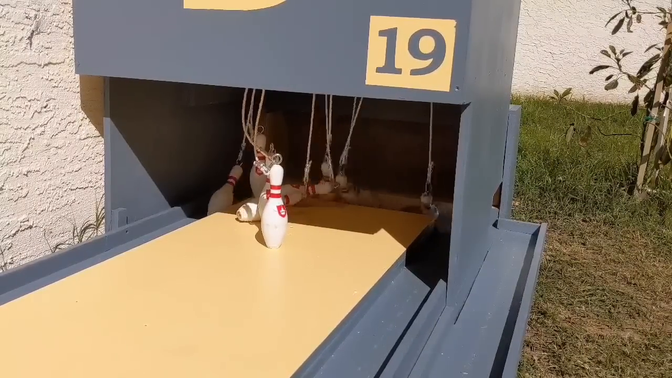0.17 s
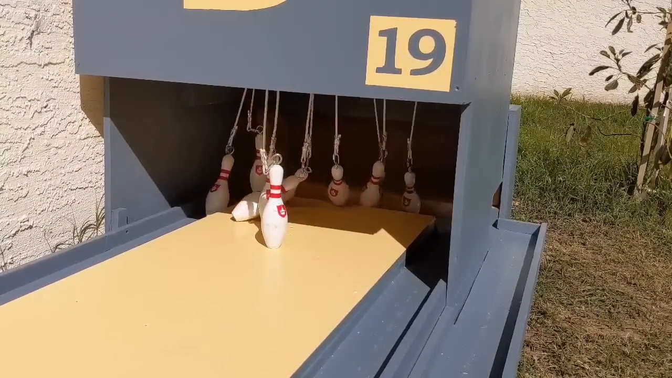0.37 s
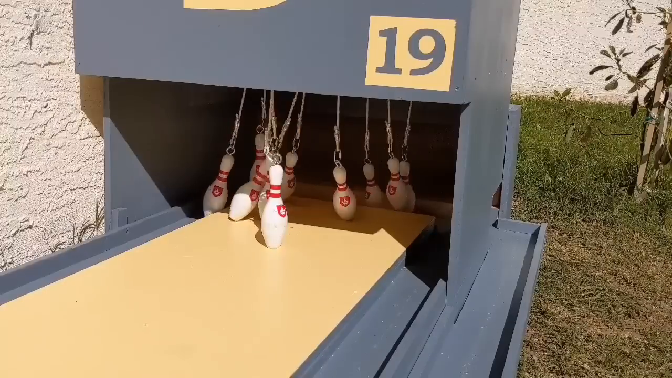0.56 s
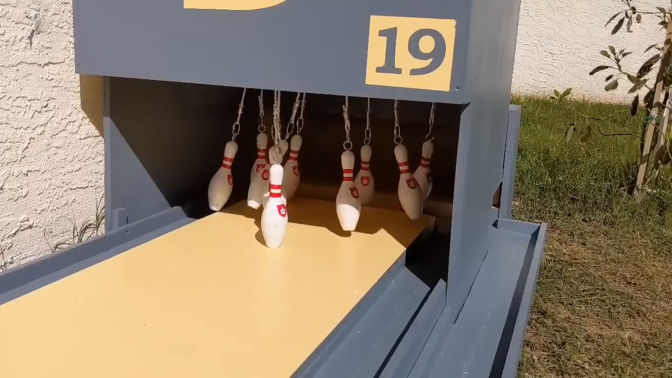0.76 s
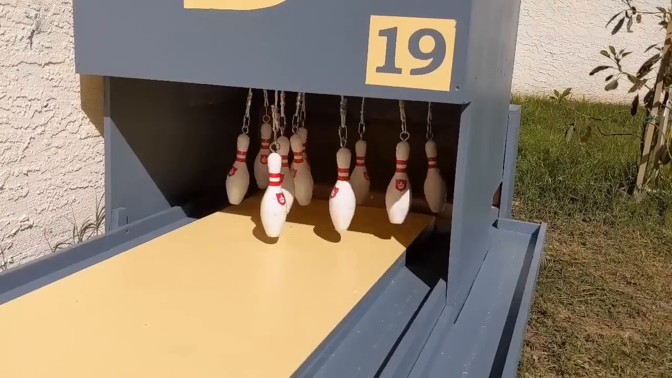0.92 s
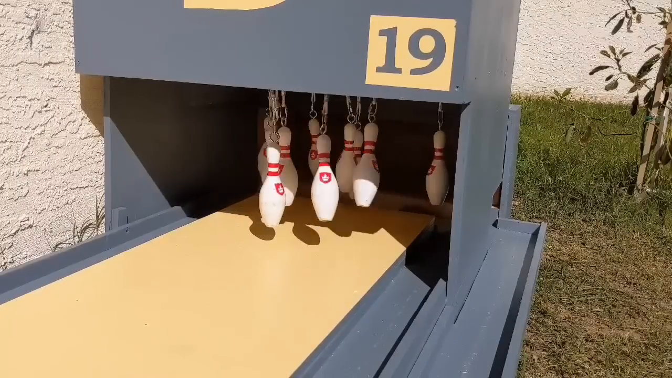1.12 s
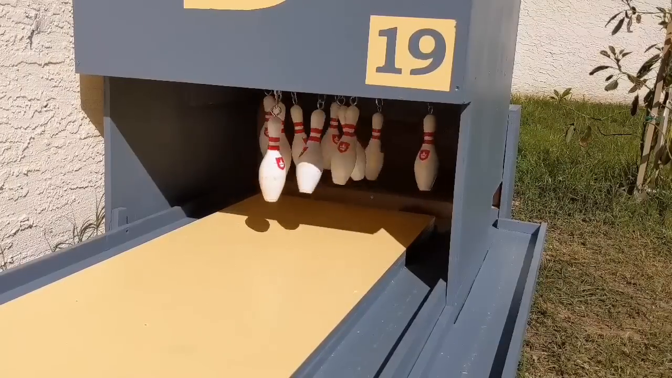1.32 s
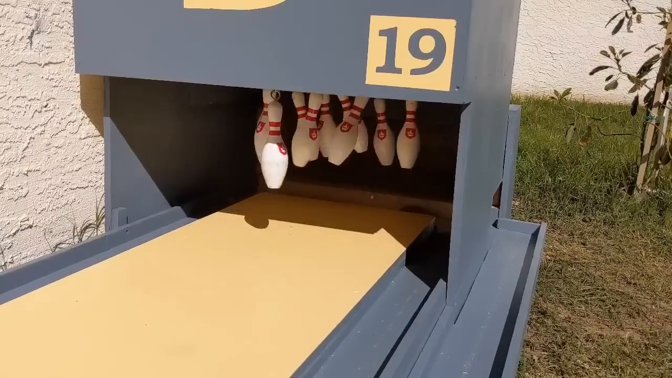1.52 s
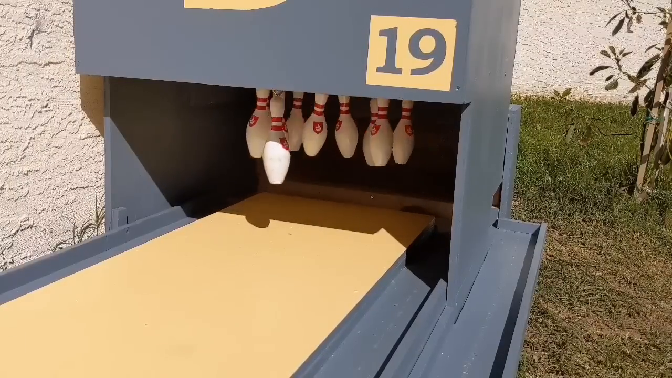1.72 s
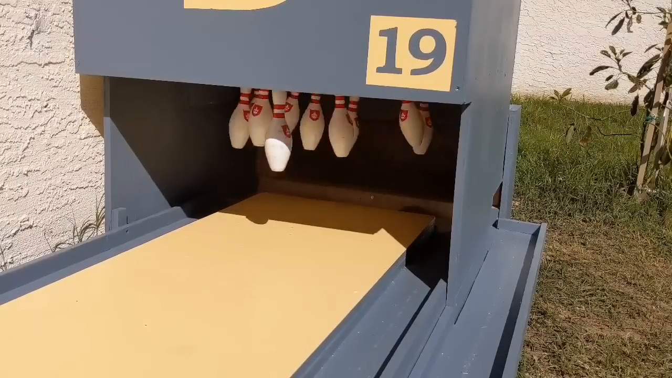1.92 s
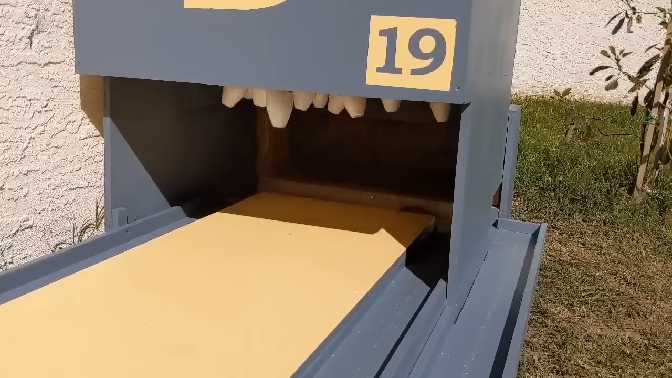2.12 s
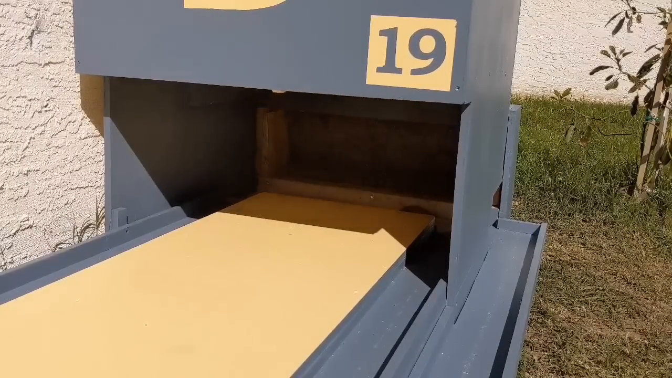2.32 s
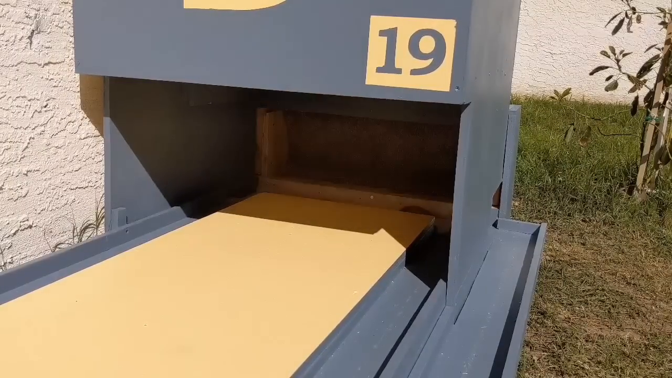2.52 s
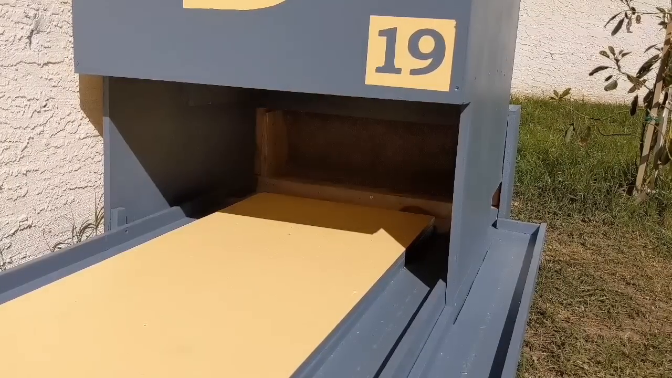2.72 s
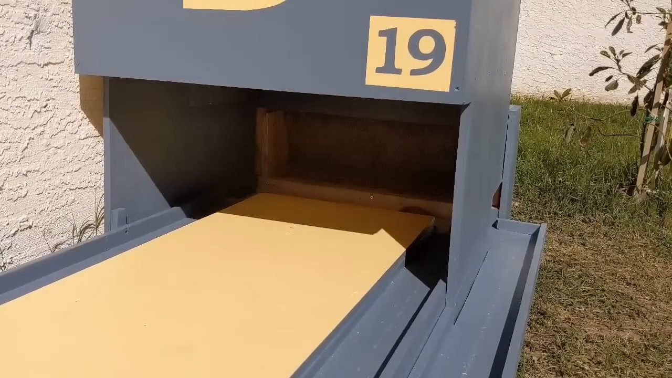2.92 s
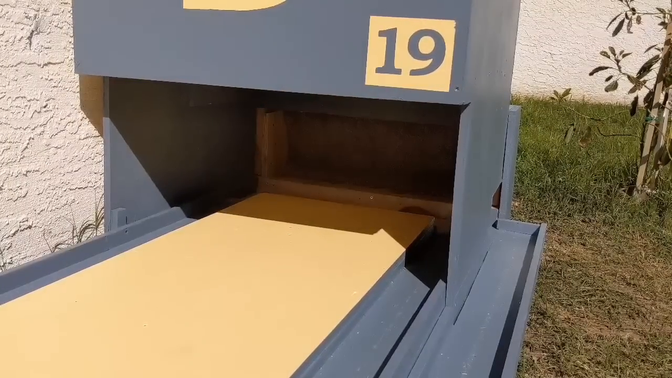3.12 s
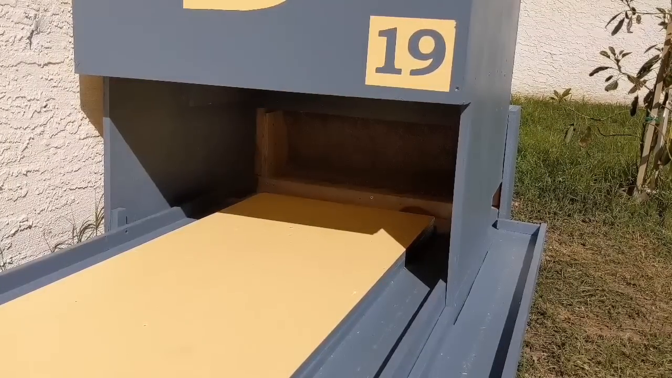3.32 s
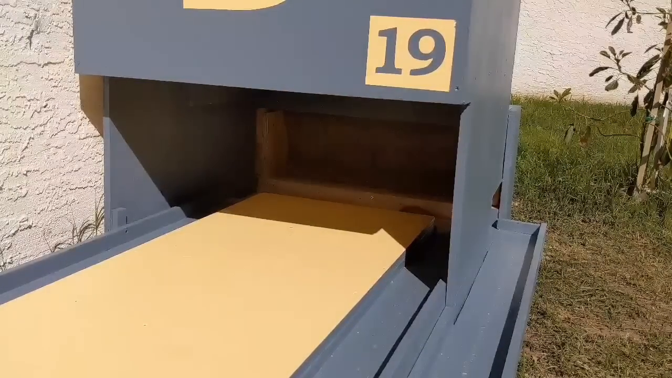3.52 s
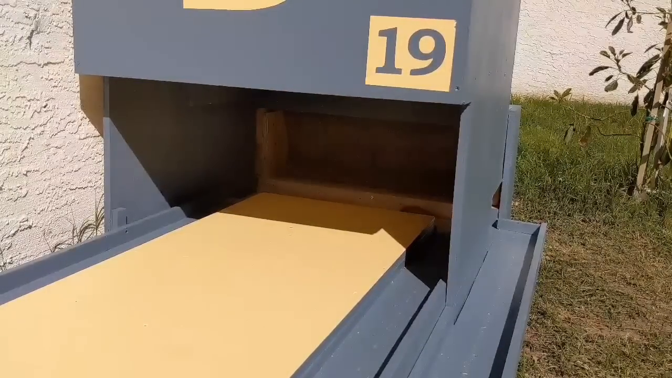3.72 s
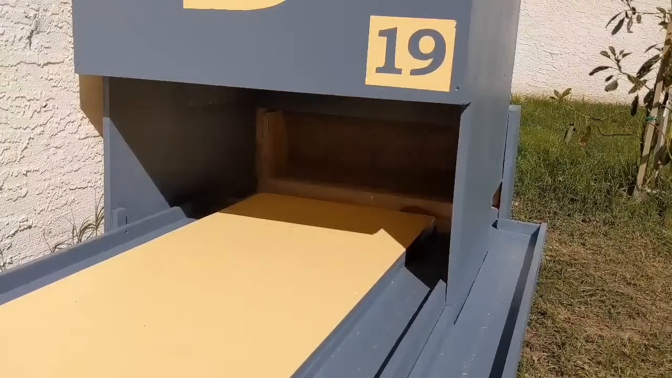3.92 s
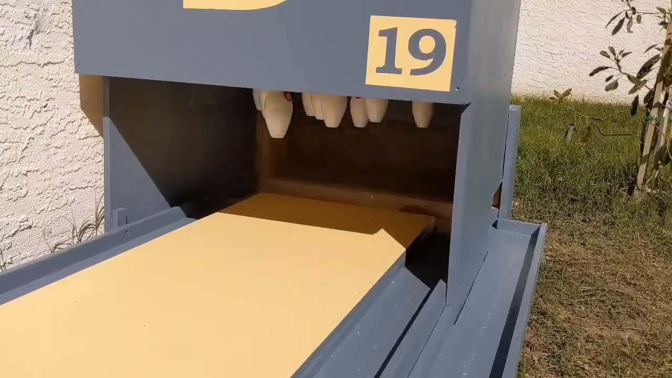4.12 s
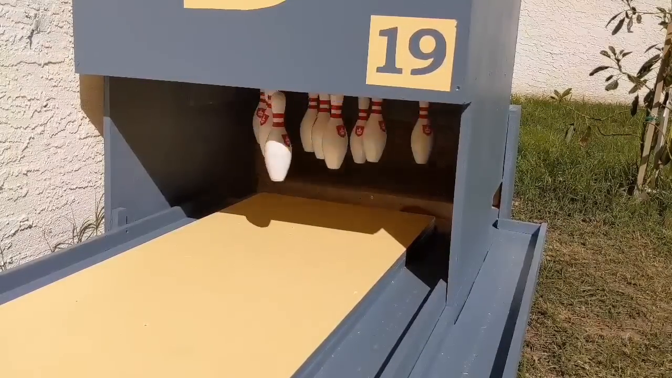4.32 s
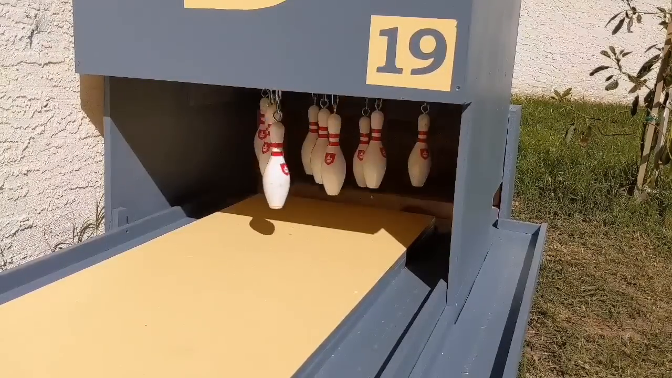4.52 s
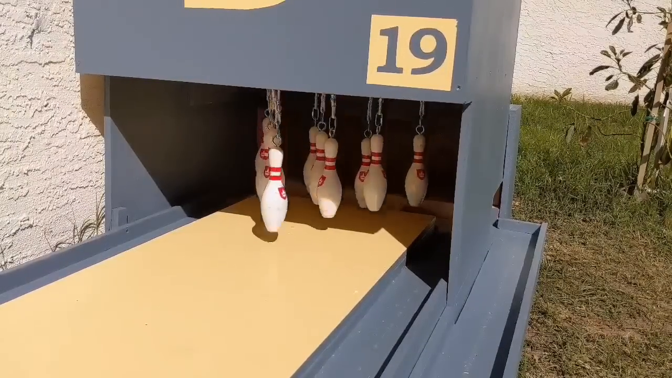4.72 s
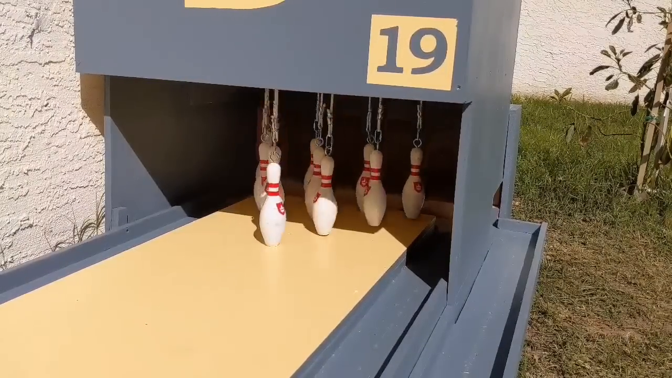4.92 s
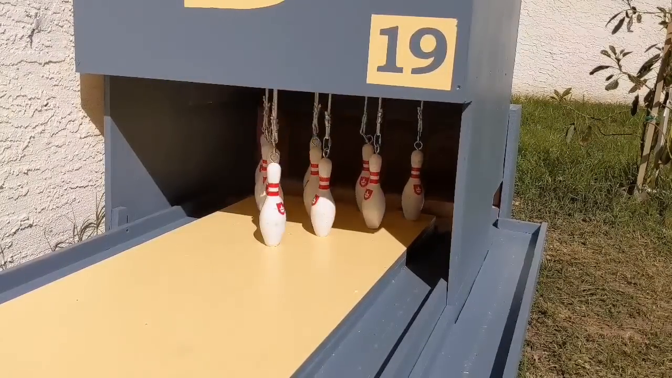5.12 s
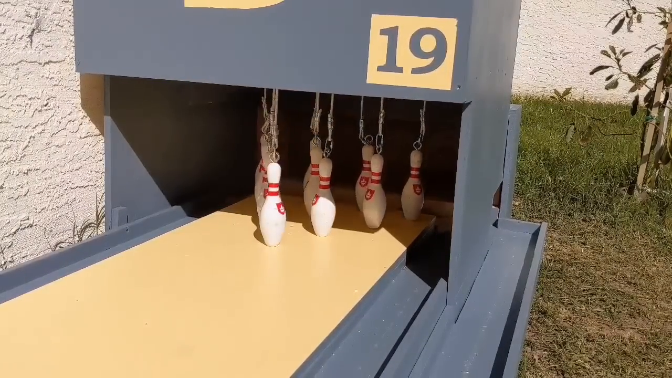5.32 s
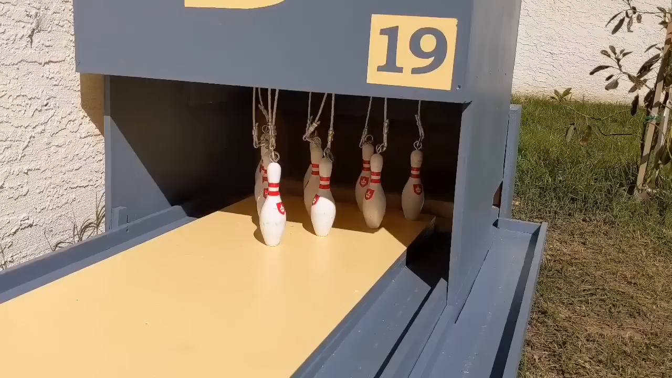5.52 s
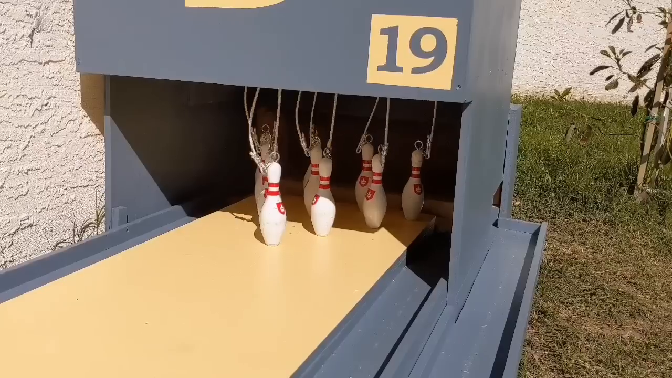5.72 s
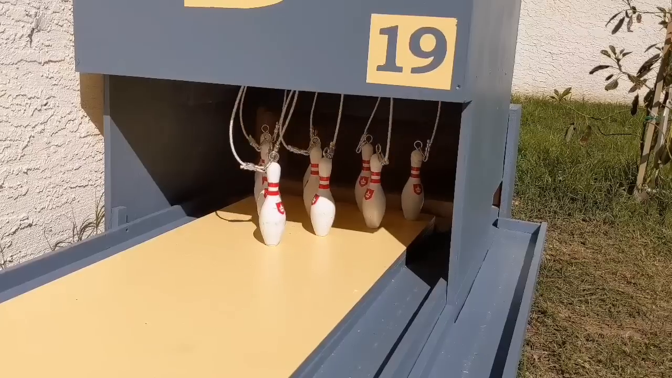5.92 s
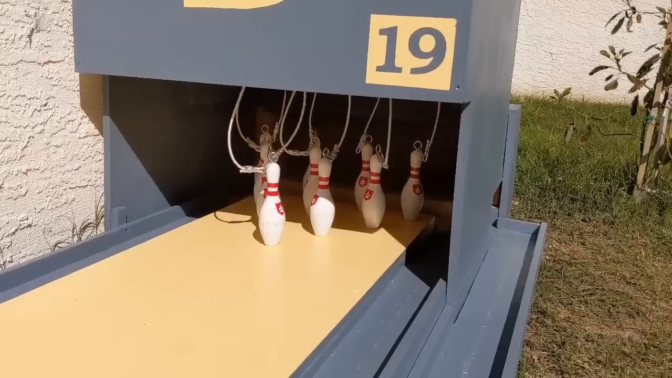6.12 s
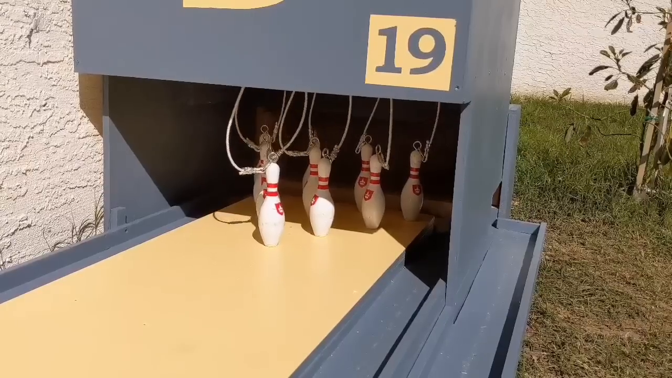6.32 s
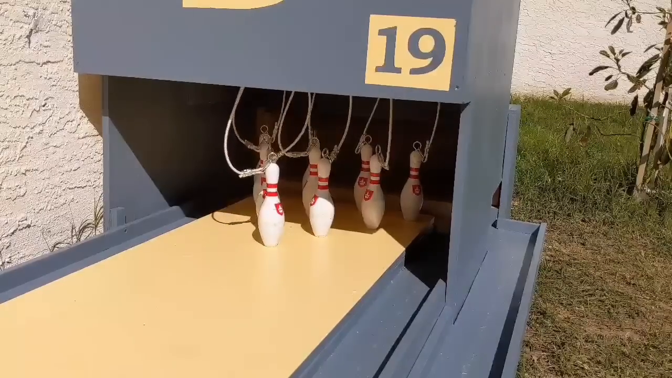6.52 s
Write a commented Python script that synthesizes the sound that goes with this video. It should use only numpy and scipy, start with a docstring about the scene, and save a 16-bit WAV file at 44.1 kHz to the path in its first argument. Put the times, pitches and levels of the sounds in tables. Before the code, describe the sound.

Dry pulleys chirp as hanging wooden pins clatter into a hollow cabinet, fall quiet, then squeak down and thump onto a wooden lane.

```python
"""Wooden pins crash in a hollow cabinet by a wall outdoors: each blow rings modes of air, pin and panels.
Hard clacks are noise bursts; hanging pins knock and ring, and landings excite boards and lane.
Dry pulleys chirp and squeal by stick-slip; filtered noise makes the drive's rumble, the strings' rustle
and a faint open-air hiss. Two microphone ports hear it, the left one nearer."""
import sys
import numpy as np
from scipy import signal
from scipy.fft import rfft, irfft
from scipy.io import wavfile
from scipy.ndimage import uniform_filter1d, minimum_filter1d

SR = 44100
rng = np.random.default_rng(int(sys.argv[2]) if len(sys.argv) > 2 else 0)


def store_wav(level_fs):
    """Save 16-bit WAV to argv[1]."""
    pcm = np.round(np.clip(np.atleast_2d(level_fs), -1, 1) * 32767)
    wavfile.write(sys.argv[1], SR, pcm.T.astype(np.int16))


N = 289296  # samples

# Blows of pins on each other and the rack. Each row: start in seconds, then levels in dB of the cabinet
# ring, the pin body and the weight into panels and frame.
KNOCKS = [(0.045, -25.5, -30, -22), (0.152, -22.5, -44, -22), (0.27, -45, -28.5, -21.5),
          (0.392, -30, -24.5, -26), (0.449, -38, -42, -23), (0.603, -36, -22, -20), (0.696, -29, -29, -20),
          (0.736, -23, -21.5, -18), (0.98, -29.5, -23.5, -28), (1.177, -27.5, -36, -44),
          (1.204, -29, -13.5, -45), (1.229, -28, -25, -35), (1.389, -23.5, -26.5, -25.5),
          (1.429, -40, -10.5, -24), (1.564, -42, -15, -30.5), (1.615, -25.5, -24, -31.5),
          (1.738, -56, -26.5, -38), (1.909, -34, -16, -46), (1.978, -25, -15, -23),
          (2.003, -31, -16.5, -25), (2.022, -31, -15, -42), (2.053, -8.5, -10.5, -23),
          (2.1, -18, -20, -14.5), (2.127, -18, -13.5, -6.5), (2.137, -14, -17, -8), (2.151, -11, -10, -4.5),
          (2.173, -43, -13, -9.5), (2.199, -26, -24, -17), (2.23, -27, -17, -34), (2.293, -28, -14, -7),
          (2.307, -11.5, -16.5, -13), (2.364, -12, -19, -11.5), (2.388, -13, -13, -13),
          (2.404, -13.5, -22, -29), (2.423, -23, -11.5, -7), (2.456, -19, -21, -7.5),
          (2.481, -14.5, -24, -13), (2.494, -18, -17, -6.5), (2.51, -26, -24, -16), (2.566, -13, -22.5, -8),
          (2.606, -44, -46, -31), (2.673, -8.5, -24, -15), (2.709, -49, -45, -17.5), (2.803, -23, -41, -13),
          (2.842, -18.5, -34, -15.5), (2.886, -15.5, -46, -19.5), (2.99, -26, -30, -29),
          (3.011, -14.5, -51, -24.5), (3.048, -40, -33, -23), (3.193, -16.5, -41, -24.5),
          (3.27, -33, -34, -23.5), (3.355, -37, -39, -28.5), (3.423, -32, -55, -53), (3.62, -22, -56, -28),
          (3.825, -45, -54, -33), (3.892, -22, -39, -27), (4.025, -31, -33, -33.5)]
# Course of the drive. Each row: time in seconds, panel rumble in dB, string and pulley rustle in dB.
DRIVE = [(0.0, -24.5, -30), (0.33, -27, -40), (0.71, -20.5, -33), (1.0, -26.5, -44.5), (1.399, -31, -39.5),
         (1.75, -31, -51), (2.1, -26, -31), (2.45, -15.5, -36), (3.05, -30.5, -45), (3.8, -34, -48.5),
         (4.24, -32, -40), (4.58, -34, -45.5), (4.8, -39, -44), (4.991, -26, -45), (5.43, -38, -45.5),
         (5.739, -35.5, -41), (6.081, -43.5, -51), (6.56, -34, -56)]
# Modes of a hanging pin. Each row: frequency in Hz, relative level in dB, t60 in seconds before stretching.
PIN_MODES = [(697, 2, 0.014), (824, 2.5, 0.038), (887, -9, 0.081), (1088, 7.5, 0.026), (1220, -7, 0.083),
             (1420, 9.5, 0.021), (1866, 1.5, 0.024)]
# Modes of a pin's blow on the lane. Each row: frequency in Hz, relative level in dB, t60 in seconds
# before stretching.
BLOW_MODES = [(593, -38, 0.049), (715, 9, 0.017), (890, -1, 0.035), (1076, 1, 0.031), (1285, 1, 0.027),
              (1450, -36, 0.016), (1890, -8, 0.023), (2160, -14, 0.052)]
# Noise spectra of a wooden clack, middle then treble. Each row: frequency in Hz, relative level in dB.
CLACK_BANDS = [(1200, -7.5), (2200, -2), (3500, -3.5), (4800, -5.5), (12000, -62)], [(3500, 1), (5000, 2),
               (9000, -0.5), (12500, -11), (16000, -14)]


def amp(db):
    """Level to amplitude: 20 dB is a factor of ten."""
    return 10 ** (np.asarray(db) / 20)


def evened(x):
    """Normalization to unit root-mean-square."""
    return x / np.sqrt(np.mean(x ** 2) + 1e-20)


def read(points, hz):
    """Interpolation of a curve along logarithmic frequency."""
    f, value = np.transpose(points)
    return np.interp(np.log(hz + 1), np.log(f + 1), value)


def add(mix, s, sound):
    """Superposition: a sound is added to the mix from s seconds on."""
    part = mix[..., max(round(s * SR), 0):][..., :sound.shape[-1]]
    part += sound[..., :part.shape[-1]]


def coloured(x, spectrum):
    """Linear filtering: a gain curve in dB multiplies the spectrum."""
    gain = amp(read(spectrum, np.fft.rfftfreq(len(x), 1 / SR)))
    return irfft(rfft(x) * gain, len(x))


def wander(count, hz):
    """Low-pass random fluctuation of unit size: white noise averaged twice over 1/hz seconds."""
    width = int(SR / hz)
    return evened(uniform_filter1d(uniform_filter1d(rng.standard_normal(count), width), width))


def ring(modes, stretch, blow_s, scatter=1, spread=0.008):
    """Modal excitation: a blow gives every decaying mode a chance share and tuning; the peak is 1."""
    hz, db, t60 = np.transpose(modes)
    t = np.arange(int(SR * stretch * t60.max()) + 64)[:, None] / SR
    luck = rng.standard_normal((4, len(hz)))
    share_db = db + 3 * luck[0]
    tuned = hz * (1 + 0.017 * luck[1] + spread * luck[3, 0])  # spread shifts all modes together
    decay = amp(share_db - 60 * t / (t60 * stretch))
    tones = decay * np.sin(2 * np.pi * tuned * t + scatter * luck[2])
    sound = tones.sum(1) * (1 - np.exp(-t[:, 0] / blow_s))
    return sound / abs(sound).max()


def slip(hz, over_db, wobble, step_db):
    """Stick-slip oscillation: an unsteady pitch with harmonics, each step_db below the last."""
    turns = 2 * np.pi * np.cumsum(hz * (1 + wobble * wander(len(hz), 255))) / SR
    tone = np.sin(turns)
    for k in range(4):
        harmonic = k + 2
        if harmonic * hz.max() < SR / 2:
            tone = tone + amp(over_db - step_db * k) * np.sin(harmonic * turns)
    return tone


def running():
    """Gating by motion: 1 while the strings run, 0 while they rest, with smoothed edges."""
    # The strings run up, down, then pay out slack. Each row: start and end in seconds.
    runs = [(0, 2.59), (3.95, 5), (5.2, 5.85)]
    t = np.arange(N) / SR
    return uniform_filter1d(1. * sum((t >= a) & (t < b) for a, b in runs), size=4000)


def shaken():
    """Stored vibration energy: each blow's weight feeds the loose clatter, which dies exponentially."""
    clatter_db, clatter_t60, idle_db = -8, 0.44, -54.5  # dB against the weight, seconds, dB at rest
    energy, t = np.full(N, amp(idle_db) ** 2), np.arange(SR) / SR
    for s, *_, weight_db in KNOCKS:
        add(energy, s, amp(weight_db + clatter_db - 60 * t / clatter_t60) ** 2)
    return np.sqrt(energy)


def air():
    """Broadband noise: a steady, faint open-air hiss."""
    # Spectrum of the air. Each row: frequency in Hz, relative level in dB.
    air_spectrum = [(150, -12), (300, 9.5), (600, -29), (1200, -7), (2500, -7.5), (4000, -20), (8000, -19),
                    (16000, -42)]
    return amp(-51) * evened(coloured(rng.standard_normal(N), air_spectrum))


def drive():
    """Forced vibration and friction noise: lumpy rumble, a hail of small knocks, and string rustle."""
    # Spectrum of the panel rumble. Each row: frequency in Hz, relative level in dB.
    rumble_spectrum = [(25, -49), (42, -7), (65, 6.5), (90, -4), (140, -5), (220, -13.5), (400, -73)]
    # Spectrum of the string rustle. Each row: frequency in Hz, relative level in dB.
    rustle_spectrum = [(500, 11), (900, 3.5), (1700, 1), (2800, 1.5), (4400, -1), (6500, -11), (11000, -14),
                       (16000, -23)]
    # Modes of loose parts. Each row: frequency in Hz, relative level in dB, t60 in seconds before stretching.
    loose_modes = [(177, 5, 0.048), (234, 6, 0.06), (339, 1.5, 0.095), (403, -6, 0.04), (492, -2.5, 0.08),
                   (592, -13.5, 0.013), (864, -4.5, 0.027), (1263, -17.5, 0.067)]
    contact_db = -8  # small pin contacts, against the rustle
    s, *columns = np.transpose(DRIVE)
    rumble_db, rustle_db = (np.interp(np.arange(N) / SR, s, c) for c in columns)
    rumble = evened(coloured(rng.standard_normal(N), rumble_spectrum) * amp(3.5 * wander(N, 25.3)))

    # six trains of chance impulses, each about 70 per second
    hail = (rng.random((6, N)) < 70 / SR) * amp(0.54 * rng.standard_normal((6, N)))
    clatter = sum(signal.oaconvolve(h, ring(loose_modes, 0.66, 0.0013))[:N] for h in hail)
    ticks = signal.oaconvolve(hail[:2].sum(0), np.exp(-np.arange(800) / 120))[:N]  # decay of about 3 ms

    busy = .25 + .75 * running()  # at rest the rustle is smoother
    grit = amp(3.2 * busy * wander(N, 37.0)) + 0.12 * busy * evened(ticks)
    rustle = coloured(rng.standard_normal(N), rustle_spectrum) * grit
    contact_modes = PIN_MODES + BLOW_MODES[-2:]
    contacts = sum(signal.oaconvolve(h ** 2, ring(contact_modes, 1.0, 0.00068, spread=0.266))[:N]
                   for h in hail)
    strings = evened(rustle) + amp(contact_db) * busy * evened(contacts)
    return amp(rumble_db) * rumble + shaken() * evened(clatter) + amp(rustle_db) * strings


def pulleys():
    """Intermittent friction tones: every pulley squeaks in fits near its own drifting pitch."""
    # Pulley tones. Each row: mean pitch in Hz, relative level in dB.
    pulley_tones = [(3090, 6.5), (4050, 5.5), (4500, 10), (5050, 2.5), (5700, -8)]
    squeak_db, rustle_ref_db, slack_db = -43.5, -35, -15  # slack_db applies while the strings rest
    squeak_per_db = 1.15  # the squeak grows faster than the rustle
    out, t = np.zeros(N), np.arange(N) / SR
    for hz, db in pulley_tones:
        drift = 1 + 0.0057 * wander(N, 7.8) + 0.018 * wander(N, 672)
        turns = 2 * np.pi * hz * np.cumsum(drift) / SR
        fits_db = 4 * wander(N, 18) + 5 * wander(N, 120)
        out += amp(db + fits_db) * np.sin(turns)
    s, _, rustle_db = np.transpose(DRIVE)
    above_ref_db = np.interp(t, s, rustle_db) - rustle_ref_db
    slack = 1 - running()
    return amp(squeak_db + squeak_per_db * above_ref_db + slack_db * slack) * evened(out)


def squeals():
    """Sustained stick-slip: long slips glide in pitch, flutter in strength and let go."""
    # Drawn-out squeals. Each row: start in seconds, length in seconds before the release, first and last
    # pitch in Hz, first and last level in dB, first overtone in dB against the tone, roughness from 0 to 1.
    squeal_rows = [(.455, .05, 7230, 7200, -50, -45, -40, .5), (.48, .085, 7010, 6960, -44, -47, -40, .5),
                   (.555, .03, 7260, 7220, -39, -41, -40, .3), (.62, .075, 7250, 7190, -44, -38, -40, .45),
                   (.69, .12, 4520, 4500, -30, -42, -26, .3), (0.716, 0.13, 3060, 3040, -32, -48, -30, 0.7),
                   (1.161, 0.15, 5090, 4980, -42, -48, -26, 0.8),
                   (1.369, 0.1, 5170, 5080, -42, -45, -35, 1.0),
                   (1.39, 0.11, 4070, 4000, -55, -41, -23, 0.79),
                   (2.68, .085, 2365, 2450, -47, -41, -9, .3), (2.765, .085, 2470, 2475, -48, -47, -3, .4),
                   (2.845, .16, 2450, 2475, -46, -56, -22, .6), (5.5, .1, 2400, 2452, -53, -38, -32, .1),
                   (5.905, .11, 2425, 2442, -48, -36.5, -22, 0),
                   (6.062, .085, 2446, 2451, -41, -41, -18, 0)]
    let_go_t60 = .05  # seconds
    out = np.zeros(N)
    for s, length, hz0, hz1, db0, db1, over_db, rough in squeal_rows:
        t = np.arange(0, length + let_go_t60, 1 / SR)
        hz = np.interp(t, [0, length], (hz0, hz1))
        db = np.interp(t, [0, length], (db0, db1))
        release_db = -60 * np.maximum(t - length, 0) / let_go_t60
        flutter = amp(db + release_db + 7 * rough * wander(len(t), 70))
        unsteady_hz = hz * (1 + .012 * rough * wander(len(t), 15))
        tone = slip(unsteady_hz, over_db, .025 * rough ** 2, step_db=3.5)
        add(out, s, flutter * tone * np.minimum(t / 0.0019, 1))
    return out


def chirps():
    """Transient stick-slip: a quick swell, a held raspy slip, then a stuttering tail."""
    # A pulley slips for a few dozen cycles. Each row: nominal time in seconds, level in dB before panning,
    # mean pitch in Hz.
    chirp_rows = [(0.059, -26.5, 2980), (0.0913, -23.5, 3644), (0.102, -27, 3660), (0.288, -25.5, 2942),
                  (0.294, -25, 4480), (0.5315, -24.5, 4120), (0.57, -31, 3000), (0.606, -29, 4000),
                  (0.679, -30, 4080), (0.686, -20, 4280), (0.703, -19, 3960), (0.945, -28, 2830),
                  (1.085, -36, 3130), (1.1278, -28, 3195), (1.146, -25.5, 3110), (1.168, -28.5, 3010),
                  (1.184, -28.5, 3900), (1.2067, -32, 4010), (1.238, -24.5, 5050), (1.352, -41, 5670),
                  (1.371, -27, 4110), (1.465, -38, 4320), (1.488, -35, 3970), (1.8102, -32, 3030),
                  (2.055, -20, 4120), (2.104, -20, 3980), (2.171, -20.5, 3820), (2.237, -28, 5160),
                  (2.293, -13.5, 4740), (2.318, -22.5, 4360), (2.38, -26, 5300), (3.9537, -39, 4460),
                  (4.0007, -15.5, 3960), (4.099, -30, 3950), (4.134, -15, 3910), (4.247, -32.5, 3940),
                  (4.279, -28, 2795), (4.416, -25.5, 4610), (4.642, -31.5, 5020), (4.722, -22.5, 4650),
                  (4.8482, -29.5, 2960), (4.9242, -35, 5200), (5.033, -40.5, 5620), (5.2403, -38, 5770),
                  (5.457, -38, 7030), (5.652, -36, 5730)]
    pan_db_per_octave, centre_hz = 3, 4000  # the higher pulleys hang to the left
    out, t = np.zeros((2, N)), np.arange(4000) / SR
    for s, db, hz in chirp_rows:
        pan_db = pan_db_per_octave * np.log2(hz / centre_hz)
        held = np.exp(-(t / 0.013) ** 3)
        tail = amp(-25.5 - 60 * t / 0.032) * wander(len(t), 220) ** 2
        # grit widens the tone
        rasp = 1 + 0.47 * wander(len(t), 960) + 0.089 * rng.standard_normal(len(t))
        swell = 1 - np.exp(-(t / 0.0011) ** 2)
        sound = slip(hz + 0 * t, -14.5, 0.017, 6.5) * rasp * (held + tail) * swell
        add(out, s - .0008, amp(db + pan_db * np.array([[.5], [-.5]])) * sound)
    return out


def landings():
    """Impact and dispersion: a dry blow, then bending waves in the lane bring the bass later."""
    # Pins set down on the lane. Each row: time of the blow in seconds, then levels in dB of the blow,
    # the boards and the lane boom, before panning.
    landing_rows = [(4.861, -2.5, -11, -33), (4.877, -36, -12, -10.5), (4.92, -6.5, -3.5, -16),
                    (4.933, -29, -11, -7.5), (4.954, -21, -11, -30), (4.964, -6, 2, -13),
                    (4.979, -21, -29, -1.5), (5.006, -23.5, -23, -11), (5.104, -34, -19.5, -25),
                    (5.208, -13, -15, -26), (5.299, -16.5, -10.5, -26), (5.312, -23, -20, -11.5),
                    (5.336, -39, -23, -19), (5.46, -29, -31, -40), (5.509, -36, -33, -46),
                    (5.647, -28.5, -29, -33), (5.747, -28, -30, -29.5), (5.778, -26, -29.5, -30),
                    (6.034, -48, -43, -30), (6.347, -40, -28, -24.5)]
    # Modes of the boards. Each row: frequency in Hz, relative level in dB, t60 in seconds before stretching.
    board_modes = [(205, -6, 0.081), (255, -0.5, 0.075), (323.6, 3.5, 0.055), (392, -4, 0.056),
                   (467, -5, 0.078)]
    # Modes of the lane. Each row: frequency in Hz, relative level in dB, t60 in seconds before stretching.
    lane_modes = [(112, 2.4, 0.19), (126.8, 2.7, 0.24), (152.3, 4.8, 0.163)]
    rock_db = -6  # the pin rings on as it rocks, against the blow
    snap_db, snap_t60 = -20, .01  # dry crack at the front, dB against the blow and seconds
    lane_pan_db = 0.5  # the lane lies to the left
    out = np.zeros(N)
    for s, blow_db, boards_db, lane_db in landing_rows:
        add(out, s, amp(blow_db) * ring(BLOW_MODES, 0.3, 0.0006, scatter=0.15))
        rocking = ring(BLOW_MODES, 1.6, 0.0031, scatter=3.35, spread=0.062)
        add(out, s, amp(blow_db + rock_db) * rocking)
        crack = evened(coloured(rng.standard_normal(1024), CLACK_BANDS[0]))
        snap = crack * amp(-60 * np.arange(1024) / SR / snap_t60)
        add(out, s, amp(blow_db + snap_db) * snap)
        add(out, s + 0.00239, amp(boards_db) * ring(board_modes, 0.39, 0.0089, scatter=0.26))
        add(out, s + 0.00664, amp(lane_db) * ring(lane_modes, 0.57, 0.0049, scatter=0.24))
    return out * amp([[lane_pan_db / 2], [-lane_pan_db / 2]])


def tocks():
    """Single-mode resonance: a tapped hanging pin gives one soft-edged, slightly unsteady dying note."""
    # Taps. Each row: start in seconds, level in dB before rise and decay, mean pitch in Hz.
    tock_rows = [(1.101, -30, 3360), (1.163, -26, 1862), (1.17, -27, 1166), (1.214, -31, 1140),
                 (1.273, -34, 1863), (1.611, -23, 1404), (4.008, -28.5, 1925), (4.121, -32.5, 2940),
                 (4.146, -29, 1840), (4.325, -41, 2760), (4.449, -26.5, 1175), (4.452, -40, 2315)]
    t60, rise_s = 0.099, 0.0017  # seconds
    out, t = np.zeros(N), np.arange(5000) / SR
    for s, db, hz in tock_rows:
        note = np.sin(2 * np.pi * hz * np.cumsum(1 + 0.014 * wander(len(t), 200)) / SR)
        add(out, s, amp(db - 60 * t / t60) * note * (1 - np.exp(-t / rise_s)))
    return out


def clacks():
    """Broadband impact: hard wood on wood gives a noise burst with scattered bounces in the cabinet."""
    # Clacks. Each row: nominal time in seconds, treble level in dB, middle level in dB, before the fade.
    clack_rows = [(0.0044, -21.5, -25), (0.039, -34, -24), (0.193, -26, -27), (0.269, -26.5, -46),
                  (0.3304, -27, -52), (0.391, -30, -24), (0.4192, -30, -50), (0.435, -32, -29),
                  (0.53, -23, -36), (0.572, -21, -43), (0.607, -22, -45), (0.6743, -18.5, -49),
                  (0.7138, -11.5, -40), (0.7394, -24, -31), (0.819, -26, -50), (1.146, -22, -41),
                  (1.2045, -17, -14.5), (1.3698, -23, -51), (1.4286, -15, -14), (1.528, -26, -46),
                  (1.5638, -26, -23.5), (1.6135, -24, -20.5), (1.737, -28.5, -44), (1.808, -29.5, -25),
                  (1.9025, -36, -22.5), (1.9738, -9, -5), (1.993, -18, -14), (2.014, -16, -11.5),
                  (2.03, -23, -13.5), (2.0437, -11, -10.5), (2.069, -20, -15), (2.1016, -17, -17),
                  (2.1304, -13.5, -13), (2.15, -24, -13), (2.168, -13.5, -17), (2.221, -35, -37),
                  (2.286, -22, -27), (2.2936, -15.5, -16), (2.312, -34, -31), (2.365, -20.5, -18.5),
                  (2.38, -19, -19), (2.4204, -23, -19), (2.4477, -21.5, -21), (2.482, -25, -21),
                  (2.83, -31.5, -44), (4.001, -24, -43), (4.012, -36, -26), (4.13, -19.5, -43),
                  (4.246, -44, -34), (4.419, -28, -54), (4.64, -36, -52), (4.72, -37, -62),
                  (4.8653, -27, -29), (4.921, -25, -35), (4.9648, -22.5, -44), (5.2067, -33, -50),
                  (5.24, -29, -34), (5.299, -34, -30), (5.325, -36, -46), (5.365, -34.5, -50),
                  (5.425, -36, -50), (5.46, -20, -51), (5.505, -24, -50), (5.648, -27, -51),
                  (5.75, -21, -38), (5.775, -31, -27), ]
    clack_t60 = 0.036  # seconds
    rattle_db, rattle_t60 = -16, 0.13  # the pins go on rattling: dB against the clack, seconds
    out, t = np.zeros(N), np.arange(8192) / SR
    for s, treble_db, middle_db in clack_rows:
        middle, treble = (evened(coloured(rng.standard_normal(len(t)), band)) for band in CLACK_BANDS)
        dying = amp(-60 * t / clack_t60) + amp(rattle_db - 60 * t / rattle_t60)
        bounces = amp(2.55 * wander(len(t), 470))
        fade = dying * bounces * (1 - np.exp(-(t / 0.0056) ** 2))
        add(out, s - .0015, (amp(treble_db) * treble + amp(middle_db) * middle) * fade)
    return out


def knocks():
    """Coupled resonators: each blow rings the cabinet air, pin and panels, and the slower-rising frame."""
    # Modes of the cabinet air. Each row: frequency in Hz, relative level in dB, t60 in seconds
    # before stretching.
    cabinet_modes = [(512, 5, 0.125), (410, -17, 0.033), (592, -17, 0.045), (1015, -14, 0.045)]
    # Modes of the panels. Each row: frequency in Hz, relative level in dB, t60 in seconds before stretching.
    panel_modes = [(172.5, -17, 0.069), (207.3, -8.5, 0.047), (240.4, -3.5, 0.11), (279, -6.5, 0.12),
                   (317.2, -4.5, 0.12), (377, 4.5, 0.033), (440, 0.5, 0.061), (629, -2.5, 0.041),
                   (792, -9, 0.051)]
    # Modes of the frame. Each row: frequency in Hz, relative level in dB, t60 in seconds before stretching.
    frame_modes = [(51, -20, 0.13), (63.6, 0.5, 0.092), (79.7, -6.5, 0.26), (90.2, 4.5, 0.24),
                   (106, 11, 0.23)]
    thud_db = -5  # the frame's share of the weight
    out = np.zeros(N)
    for s, cabinet_db, pin_db, weight_db in KNOCKS:
        add(out, s, amp(cabinet_db) * ring(cabinet_modes, 0.85, 0.0028, spread=0.004))
        add(out, s, amp(pin_db) * ring(PIN_MODES, 0.79, 0.0021, spread=0.055))
        add(out, s, amp(weight_db) * ring(panel_modes, 0.92, 0.0026, spread=0.043))
        add(out, s, amp(weight_db + thud_db) * ring(frame_modes, 0.96, 0.022))
    return out


def cabinet_echo(x):
    """Reverberation: sparse reflections of random sign die fast in the open cabinet and at the wall."""
    fade = amp(-60 * np.arange(9000) / SR / 0.17)
    taps = rng.choice([-1., 1.], 9000) * (rng.random(9000) < .06) * fade
    taps[:150] = 0  # no reflection in the first 3.4 ms
    # the echo is thin, with little bass
    taps = signal.lfilter(*signal.butter(1, 650, "high", fs=SR), taps)
    return signal.oaconvolve(x, taps[None] / np.linalg.norm(taps), axes=1)[:, :N]


def ports(x, size, wander_share, right_db):
    """Interaural-like phase and level: the right port lags, its phase wandering in (frames, bins) patches."""
    # Phase lead of the left port. Each row: frequency in Hz, lead in radians.
    lead_curve = [(0, 0), (800, .1), (1150, .5), (2000, 6), (2900, 7.2), (4300, 13), (5500, 25),
                  (15800, 38)]
    # Likeness of the ports. Each row: frequency in Hz, left-right likeness at a wander_share of 1.
    likeness = [(60, .96), (160, .92), (600, .97), (1600, .35), (2500, .55), (4500, .5), (15000, .2)]
    # Level excess of the left port. Each row: frequency in Hz, excess in dB before right_db.
    nearer = [(60, 6.5), (150, 8.5), (400, 6), (1000, 3), (2500, 0.5), (5000, 3), (12000, 1.5)]
    hz, t, z = signal.stft(x[1], SR, nperseg=512, noverlap=384)
    swing = wander_share * np.sqrt(-2 * np.log(np.clip(read(likeness, hz), .01, 1)))[:, None]
    chance = uniform_filter1d(rng.standard_normal((len(t), len(hz))), size=size[0], axis=0)
    chance = uniform_filter1d(chance, size=size[1], axis=1)
    f, lead = np.transpose(lead_curve)
    phase = swing * evened(chance).T - np.interp(hz, f, lead)[:, None]
    z = z * np.exp(1j * phase) * amp(right_db - read(nearer, hz))[:, None]
    right = signal.istft(z, SR, nperseg=512, noverlap=384)[1][:N]
    return np.array([x[0], right]) * amp(1.0)


def scene():
    """Superposition: near sources with their echo, and the more diffuse drive and air around them."""
    near = pulleys() + squeals() + chirps() + landings() + tocks() + clacks() + knocks()
    around = drive() + air()
    with_echo = near + amp(-5.5) * cabinet_echo(near)
    direct = ports(with_echo, size=(12, 4), wander_share=1.0, right_db=1.5)
    diffuse = ports(np.array([around, around]), size=(2, 1), wander_share=1.61, right_db=4.5)
    return direct + diffuse


def record(dry):
    """Level and band limits: bass roll-off, a peak limiter, then a steep low-pass."""
    thin = signal.sosfilt(signal.butter(3, 40, "high", fs=SR, output="sos"), dry)
    peak = -minimum_filter1d(-abs(thin).max(0), size=600)  # running maximum of both ports
    held = thin * uniform_filter1d(np.minimum(1, .85 / peak), size=600)
    low_pass = signal.firwin(1501, 15850, window=("kaiser", 9), fs=SR)  # edge in Hz
    return signal.oaconvolve(held, low_pass[None], "same")


dry = scene()
out = record(dry)
store_wav(out)
```